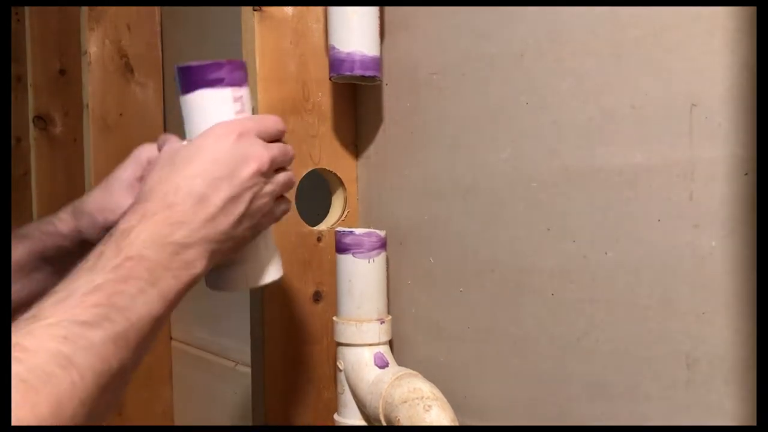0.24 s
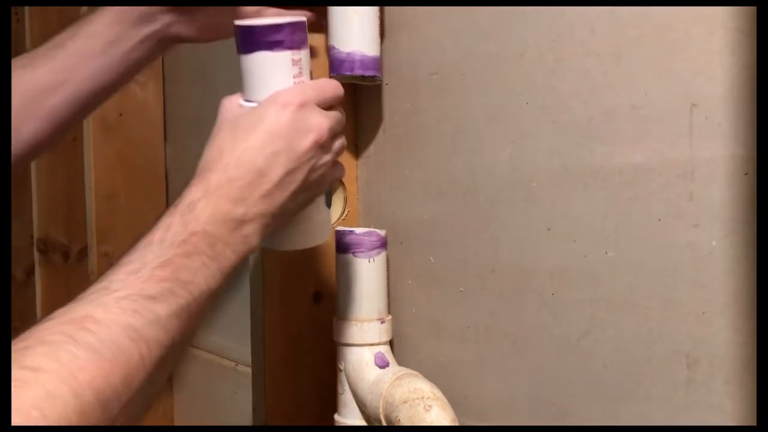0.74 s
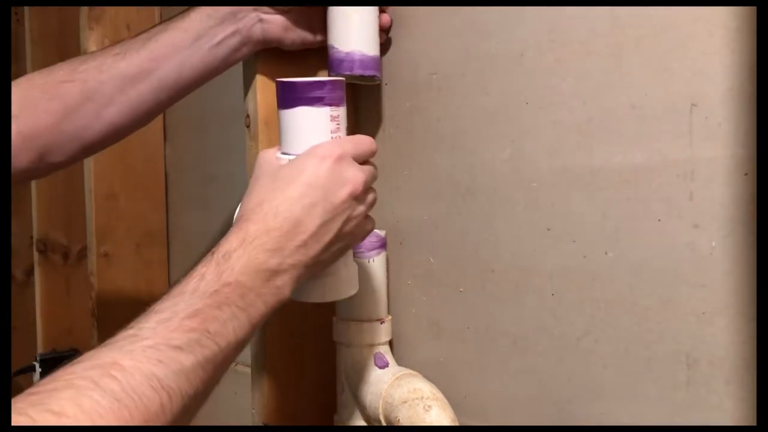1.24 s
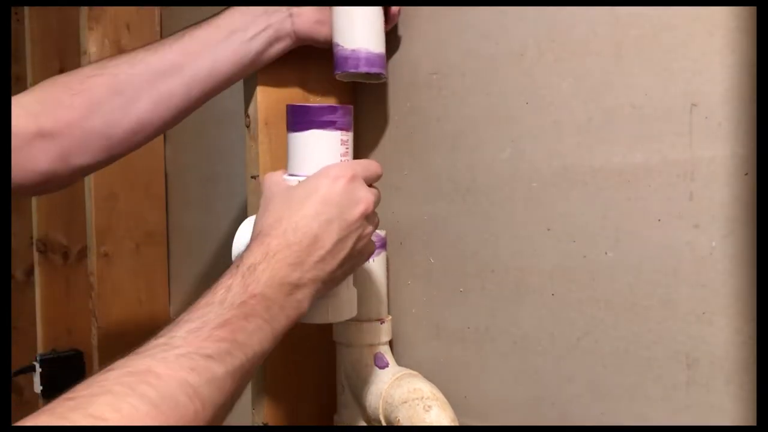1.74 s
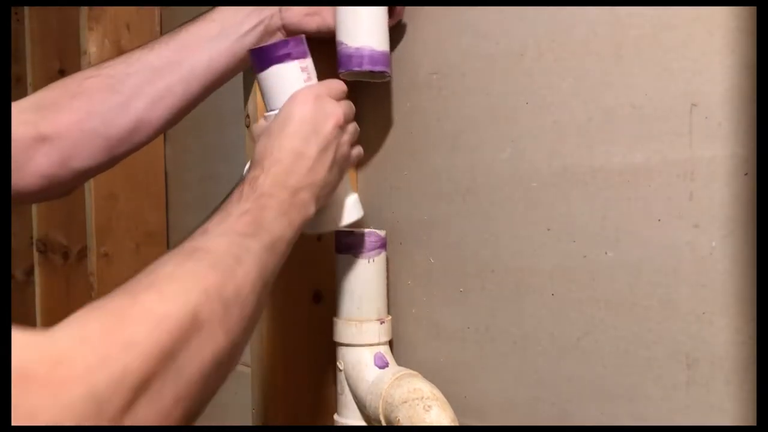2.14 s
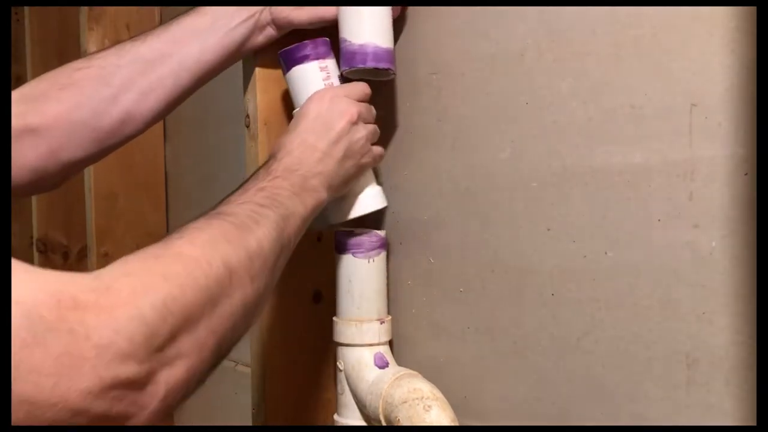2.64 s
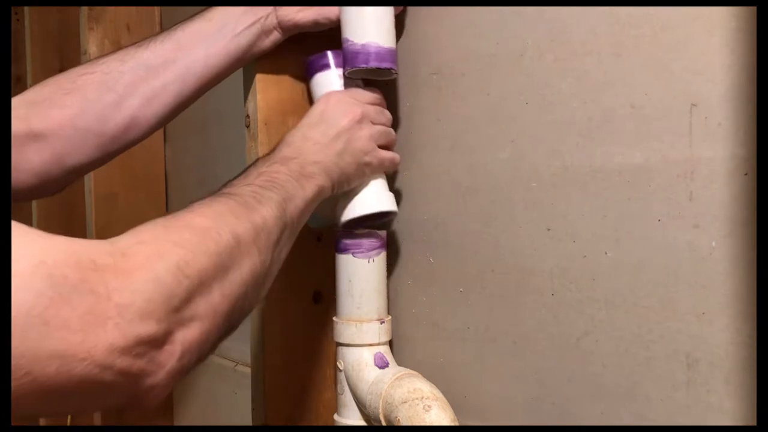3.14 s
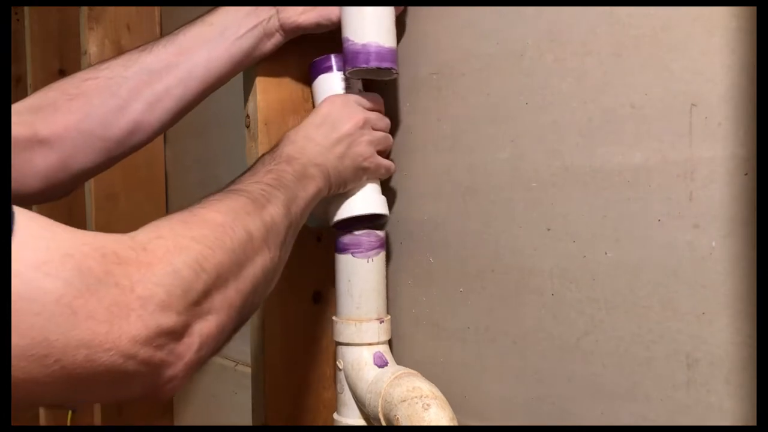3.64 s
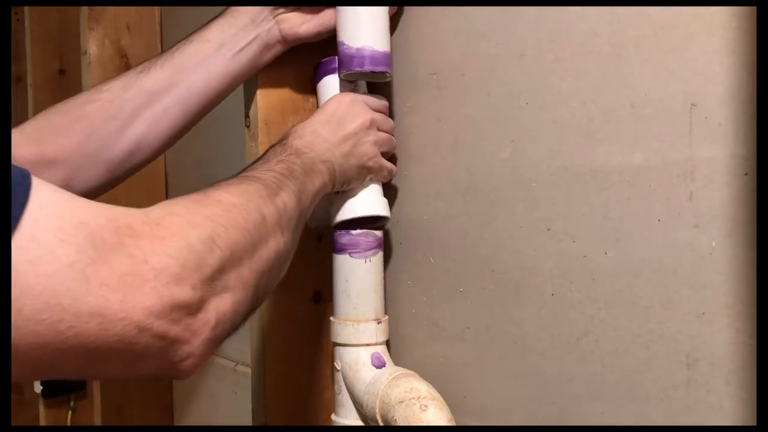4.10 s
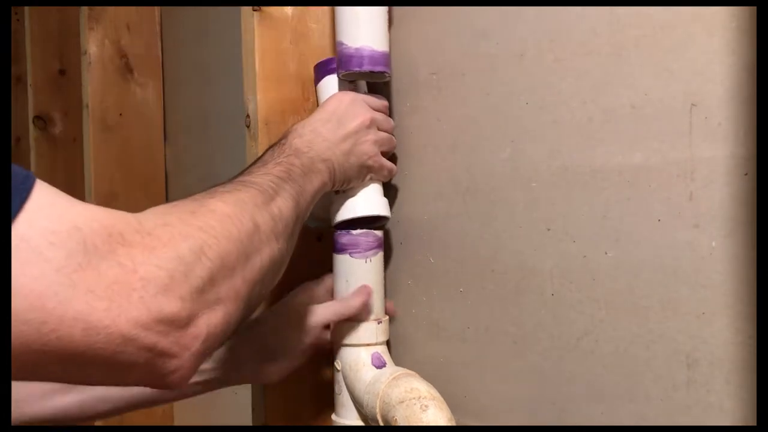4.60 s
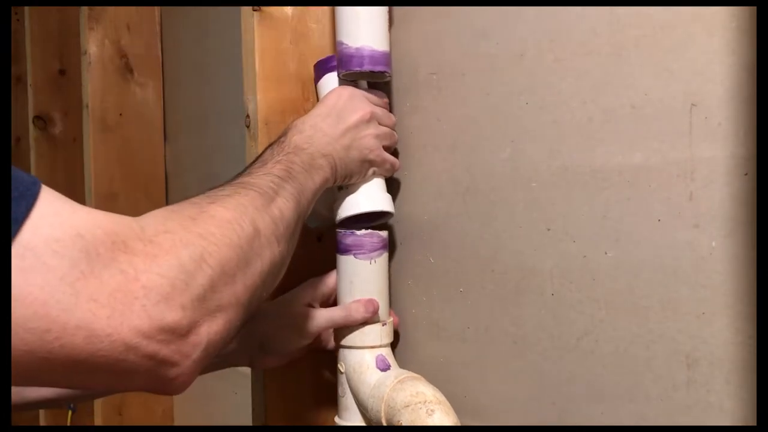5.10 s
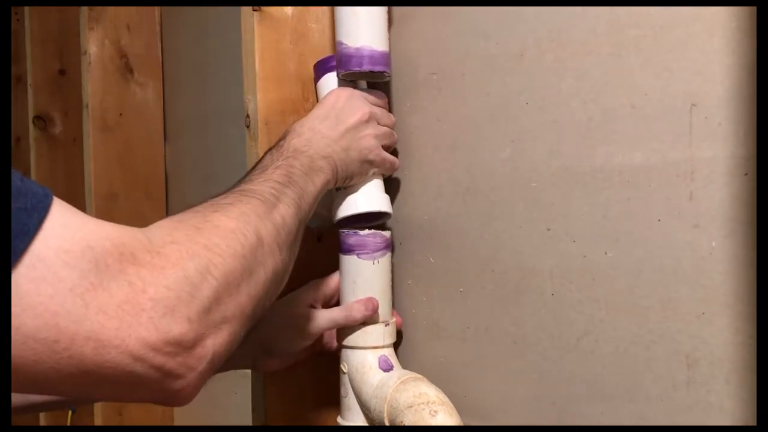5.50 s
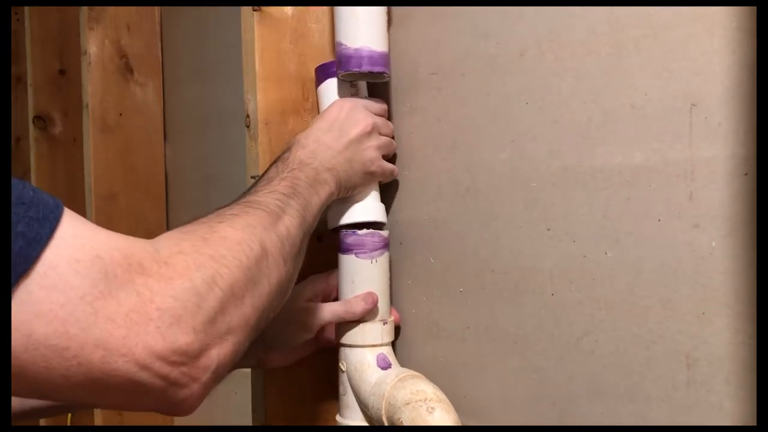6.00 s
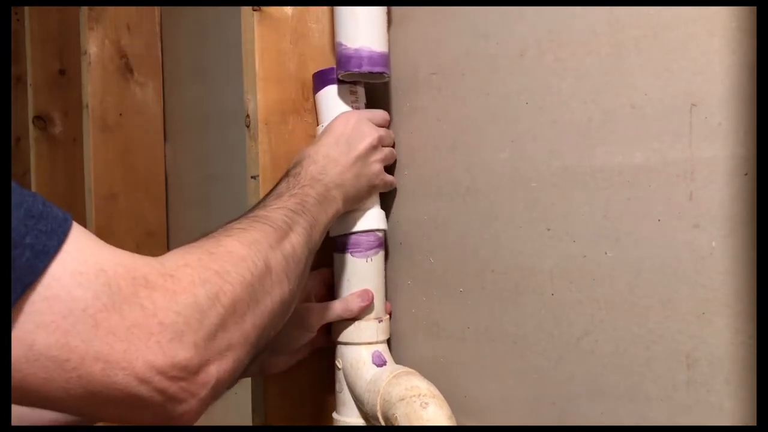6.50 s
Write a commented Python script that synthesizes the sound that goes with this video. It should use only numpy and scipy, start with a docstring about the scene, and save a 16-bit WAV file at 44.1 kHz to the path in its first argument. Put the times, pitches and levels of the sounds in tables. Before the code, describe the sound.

A phone close to a stud wall picks up dry plastic scraping, brief squeaks and hollow pipe knocks, with short room echoes. Three sharp knocks stand out in the first half, another moderate one follows, then handling grows sparser until a dull low thump and gritty, ticking rubs at the end. Steady low air noise and a faint high whine lie beneath.

```python
"""In a bare room, close to a phone, a plastic drain fitting is worked into a gap between two pipes on a stud wall.
Ventilation lies underneath: coloured noise for the low rumble, two wandering tones for the whine.
Skin hiss is shaped noise, plastic scrape a dense train of slips; narrow squeaks and broader squeaky rubs are
wandering carriers, and edges tick in noise bursts. Decaying modes make the wall thud and the fitting knock
hollowly against pipe and stud. The room answers the handling with a short tail whose lows last longest."""
import sys
import numpy as np
from scipy import signal
from scipy.fft import rfft, irfft
from scipy.io import wavfile

SR = 44100
rng = np.random.default_rng(int(sys.argv[2]) if len(sys.argv) > 2 else 0)


def file_out(sig):
    """Save sig as 16-bit WAV at sys.argv[1]."""
    # one column per channel
    cols = np.atleast_2d(sig).T
    # limit, then scale
    lim = np.clip(cols, -1, 1)
    pcm = np.round(lim * 32767).astype(np.int16)
    wavfile.write(sys.argv[1], SR, pcm)


N = 297675
T = np.arange(N) / SR
RING = T[:SR // 2]  # half a second for every ring and tail


def undb(db):
    """Decibels to gain."""
    return 10 ** (np.asarray(db) / 20)


def unit(x):
    """Scale to rms 1."""
    return x / np.sqrt(np.mean(x ** 2))


def decay(t60):
    """Exponential die-away that falls 60 dB in t60 seconds."""
    return np.exp(-np.log(1000) * RING / t60)


def add(track, start_s, sound):
    """Mix a sound into the track at its start time."""
    i = max(int(start_s * SR), 0)
    track[i:i + len(sound)] += sound[:N - i]


def octaves(length):
    """Position of each spectrum bin in octaves above 1 Hz."""
    return np.log2(np.maximum(np.fft.rfftfreq(length, 1 / SR), 1))


def colour(x, points, tilt_db=0):
    """Equalise by (f/Hz, level/dB) points and a tilt in dB per octave; rms 1."""
    octave = octaves(len(x))
    hz, db = np.transpose(points)
    edges = np.log2(hz)
    curve = np.interp(octave, edges, db) + tilt_db * octave
    low_skirt = 12 * np.minimum(octave - edges[0], 0)  # 12 dB per octave below the first point
    return unit(irfft(rfft(x) * undb(curve + low_skirt), len(x)))


def walk(rate):
    """Random wander of rms 1, gliding between `rate` fresh values a second."""
    return unit(np.interp(T * rate, np.arange(SR), rng.standard_normal(SR)))


def whistle(hz, width_hz):
    """An unsteady tone or, at larger widths, a band of noise: two quadrature carriers of wandering strength."""
    in_phase = walk(width_hz) * np.sin(2 * np.pi * hz * T)
    quadrature = walk(width_hz) * np.cos(2 * np.pi * hz * T)
    return in_phase + quadrature


def ring(modes, contact_ms, rise_s):
    """Modes after one push: a longer contact weakens the high ones, and the ring takes a moment to build."""
    hz, t60, db = np.transpose(modes)[:, :, None]
    push = 1 / np.sqrt(1 + (hz * contact_ms / 1000) ** 4)
    waves = undb(db) * push * decay(t60) * np.sin(2 * np.pi * hz * RING)
    return waves.sum(axis=0) * (1 - np.exp(-(RING / rise_s) ** 2))


# spectrum of the ventilation rumble: f/Hz, level/dB
RUMBLE_COLOUR = [(15, -37), (25, -4), (66, 3), (242, -4), (677, -11), (1160, -14), (1260, -13.5),
                 (1610, -21), (2840, -28), (3340, -25.5), (3720, -35), (5880, -31.5), (9070, -52),
                 (14000, -36.5), (16000, -44)]
# thin whine of the moving air: f/Hz, width/Hz, level/dB
WHINE = [(3260, 62, -82.5), (3435, 200, -80.5)]


def ventilation():
    """A nearly steady low rumble with a faint high whine of moving air."""
    rumble = colour(rng.standard_normal(N), RUMBLE_COLOUR) * undb(-53.5 + .5 * walk(2.91))
    whine = sum(undb(db) * whistle(hz, width_hz) for hz, width_hz, db in WHINE)
    return rumble + whine


# narrow squeaks and broader squeaky rubs of dry plastic: middle t/s, length/s, f/Hz, width/Hz,
# level before flutter/dB
SQUEAKS = [(.32, .09, 3260, 2840, -57), (1.314, 0.16, 2900, 890, -65.5), (0.384, 0.028, 2600, 1775, -56.5),
           (0.622, 0.048, 747, 605, -46), (3.013, 0.2, 6300, 514, -67.5), (3.07, 0.2, 1000, 692, -55),
           (3.277, .066, 11950, 1000, -68), (3.485, 0.067, 12000, 1010, -61), (6.205, .12, 3950, 885, -62),
           (6.242, 0.18, 1910, 1310, -58.5), (6.33, .025, 4060, 494, -56), (6.33, .04, 2085, 496, -57)]


def squeaks():
    """Dry plastic squeaks and rubs faintly as it drags, in quick stuttering catches."""
    out = np.zeros(N)
    for middle, length, hz, width_hz, db in SQUEAKS:
        swell = np.exp(-(2 * (T - middle) / length) ** 2)
        out += undb(db) * whistle(hz, width_hz) * swell
    flutter = undb(2.5 * walk(120) - 2)
    return out * flutter


def stroke(start, length):
    """Speed of one stroke as a gain: it speeds up, slows as it goes, then lifts off."""
    attack_share, sag_db_per_length, release_s = 0.29, 5.5, 0.014
    progress = np.clip((T - start) / length, 0, 1)
    rise = np.sin(np.pi / 2 * np.minimum(progress / attack_share, 1)) ** 2
    sag = undb(-sag_db_per_length * np.maximum(progress - attack_share, 0))
    release = np.exp(-np.maximum(T - start - length, 0) / release_s)
    return rise * sag * release


def slips(rate, spread_db):
    """Friction as a random train of tiny slips of uneven size, `rate` a second on average."""
    happens = rng.random(N) < rate / SR
    extra_db = spread_db * np.minimum(rng.exponential(size=N), 4)
    return happens * rng.standard_normal(N) * undb(extra_db)


# strokes of hand and fitting along the pipe: start t/s, length/s, light skin hiss drive level/dB,
# firm scrape drive level/dB
STROKES = [(0.28, 0.15, -64.5, -58), (.56, 0.12, -85, -61), (0.803, 0.064, -68, -57),
           (1.245, 0.079, -68, -60.5), (1.355, 0.15, -64, -62.5), (1.453, 0.35, -66, -62.5),
           (2.028, 0.2, -60, -71), (2.548, 0.087, -69, -56.5), (2.835, 0.18, -67, -63.5),
           (3.375, 0.13, -62.5, -53.5), (3.995, .14, -55.5, -58.5), (4.05, .16, -56.5, -80),
           (4.429, 0.16, -56, -79), (4.533, .035, -53, -53.5), (4.558, 0.3, -71.5, -63),
           (5.089, .06, -67, -55), (5.291, 0.026, -71, -62), (5.439, 0.038, -74, -59.5),
           (5.73, 0.087, -67, -60.5), (6.141, 0.26, -61.5, -58.5), (6.455, 0.095, -65, -63),
           (6.564, 0.18, -64, -65.5)]
# faint hiss between strokes: t/s, drive level/dB
HISS_FLOOR = [(0, -68), (1.7, -73.5), (2.4, -73), (3.3, -76), (3.95, -71), (4.3, -77.5), (5.2, -82),
              (5.45, -75.5), (6.1, -72.5), (6.75, -70)]
# spectrum of skin on smooth pipe: f/Hz, level/dB
HISS_COLOUR = [(1500, -3), (4000, -4), (7000, 0.5), (11000, -1.5), (16000, -4)]
# spectrum of plastic scraping under pressure: f/Hz, level/dB
SCRAPE_COLOUR = [(120, 4), (300, 14), (800, 9), (1300, 5.5), (1700, 1.5), (2100, 1), (2800, -4.5),
                 (4000, -5), (4800, -8.5), (7000, -14), (14000, -44)]


def sliding():
    """Skin hisses lightly over the smooth pipe; under pressure the plastic scrapes and stirs the hollow body."""
    hiss_power = undb(np.interp(T, *np.transpose(HISS_FLOOR))) ** 2
    # the held fitting never rests quite still
    scrape_power = undb(-68.5 + 2.0 * walk(11)) ** 2
    for start, length, hiss_db, scrape_db in STROKES:
        speed = stroke(start, length)
        hiss_power += (undb(hiss_db) * speed) ** 2
        scrape_power += (undb(scrape_db) * speed) ** 2

    hiss = colour(rng.standard_normal(N), HISS_COLOUR) * undb(0.89 * walk(40))
    grip = slips(rate=5000, spread_db=1.5) * undb(3.2 * walk(35))
    scrape = colour(grip, SCRAPE_COLOUR) * undb(4.5)
    body_ring = ring(PIPE_MODES, contact_ms=2.8, rise_s=0.0033)
    body = unit(signal.fftconvolve(grip, body_ring)[:N]) * undb(-1.0)
    # burrs on the sawn edge catch one by one
    grit = colour(slips(rate=220, spread_db=2), TICK_COLOUR, tilt_db=-2.5) * undb(-7.5)
    return hiss * np.sqrt(hiss_power) + (scrape + body + grit) * np.sqrt(scrape_power)


# plastic edges catching and slipping: t/s, level before decay/dB, tilt/dB per octave, t60/s
TICKS = [(0.299, -50, -18, .15), (.564, -50, -7, .05), (0.722, -54, -1, 0.047), (.807, -47.5, -1.5, .086),
         (2.161, -26, -12.5, 0.049), (2.286, -53, 0, 0.033), (2.479, -39, -12.5, .03),
         (2.5375, -40.5, -3.5, 0.033), (2.717, -54, -3, 0.026), (2.793, -55, 0, 0.17),
         (3.399, -40.5, -2, 0.038), (3.477, -41, -5.5, 0.052), (3.679, -47.5, -1, 0.017),
         (4.425, -50.5, 2, 0.064), (5.2893, -55.5, -3, .024), (5.4376, -50.5, -4, .012),
         (5.5083, -47, 3.5, .018), (5.742, -48, -3, 0.069), (5.807, -51, -2, 0.061), (6.204, -49.5, 2, .22),
         (6.321, -43.5, 9, 0.067), (6.434, -52, -3, .03), (6.465, -47, 2.5, 0.11), (6.517, -51, 2, 0.086),
         (6.706, -54.5, 1.5, 0.096)]
# spectrum of an edge letting go, also used for the grit in the sliding: f/Hz, level/dB
TICK_COLOUR = [(500, -6.5), (1200, 0), (1600, 6), (2150, 4.5), (2900, -0.5), (4100, 4), (4900, 0),
               (6200, 0), (9000, -6.5), (16000, -6.5)]


def ticks():
    """An edge lets go in a short, dying crackle of coloured noise."""
    out = np.zeros(N)
    for start, db, tilt_db, t60 in TICKS:
        crack = colour(rng.standard_normal(len(RING)), TICK_COLOUR, tilt_db)
        add(out, start, undb(db) * crack * decay(t60))
    return out


# shoves carried into the wall: t/s, drive level/dB, contact time/ms
THUDS = [(.002, -46, 7.5), (.41, -47, 8.5), (0.58, -47.5, 3), (.628, -45, 2), (0.84, -55, 2),
         (3.484, -45.5, 10), (4.165, -43, 18), (4.438, -42, 2.2), (4.499, -46, 2.6), (4.619, -45.5, 12.4),
         (5.128, -53, 2), (5.836, -30, 29.3), (5.985, -45, 9.8), (6.386, -46.5, 13)]
# modes of the stud wall that carries the pipes: f/Hz, t60/s, level/dB
WALL_MODES = [(59.4, 0.17, 9.5), (66.3, 0.089, 9.5), (89.1, 0.22, 11.5), (113, 0.14, 4),
              (155.7, 0.19, 12.5), (214.8, 0.23, 10.5)]


def thuds():
    """The wall takes up the heavier shoves, and a little of every knock, as a slow low ring."""
    rise_s = .0113
    out = np.zeros(N)
    for start, db, contact_ms in THUDS:
        add(out, start, undb(db) * ring(WALL_MODES, contact_ms, rise_s))
    shaken = ring(WALL_MODES, contact_ms=5, rise_s=rise_s)
    for start, db, *_ in KNOCKS:
        add(out, start, undb(db - 39) * shaken)
    return out


# knocks of the fitting: t/s, drive level/dB, hollow air note f/Hz, contact time/ms, relative rim level/dB
KNOCKS = [(.002, -31.5, 485, 0.22, 2.5), (.564, -38, 400, 0.7, -1), (.572, -23, 218, 8.4, 6),
          (0.594, -30.5, 228, 1.2, -12), (.613, -33, 263, 2.4, 9), (.645, -24.5, 222, 3.5, 1),
          (.808, -38, 403, .75, 8), (.876, -45, 408, 1.0, 3), (2.1616, -7, 439.6, 0.66, 5),
          (2.456, -42, 430, 0.83, 6.5), (2.484, -32, 285, 0.73, -13), (2.506, -33, 393, 3.6, -21),
          (2.538, -8.5, 427, 0.89, -4), (2.5468, -15, 433, 11, -19), (2.871, -36.5, 290, 1.6, 2),
          (3.126, -27, 261, 2.3, 3), (3.227, -30.5, 206, 2.6, -2), (3.264, -33.5, 234, 4.7, -2),
          (3.436, -34, 395, 1.2, -2), (3.4791, -12.5, 325.6, 1.35, -4), (3.483, -21, 440, 17, -16),
          (3.642, -39, 252, 3.6, 14), (3.734, -42.5, 306, .82, 10), (4.426, -18, 442, 1.03, -6.5),
          (4.465, -29.5, 417, 1.7, -4), (4.869, -36, 220, 2.7, 0), (5.807, -34.5, 230, .55, 9),
          (5.969, -32, 189, 0.46, -3), (5.996, -34, 228, 2.8, -4), (6.379, -46, 415, .7, 10.5),
          (6.432, -42, 413, .6, 2)]
# wall modes of the fitting and its pipe: f/Hz, t60/s, level/dB
PIPE_MODES = [(211.7, 0.21, -21), (261.6, 0.087, -10), (291, 0.077, -7.5), (374, 0.048, -32),
              (466, 0.087, -10), (523.2, 0.063, -6), (630, 0.089, -14), (914, 0.023, -5.5),
              (1030, 0.022, -6.5), (1170, 0.04, -16.5), (1278, 0.031, -10), (1518, 0.02, -8),
              (1677, 0.011, 0), (2140, 0.016, -10), (2595, 0.02, -17.5), (2840, 0.022, -15)]
# the open rim flexing oval when caught on the edge: f/Hz, t60/s, level/dB
RIM_MODES = [(743, 0.027, -11), (776.6, 0.027, 0), (824, 0.044, -6)]


def knocks():
    """Each knock rings the enclosed air, the plastic wall and, by where it lands, the rim."""
    out = np.zeros(N)
    for start, db, hollow_hz, contact_ms, rim_db in KNOCKS:
        # the air note is lower where hand and pipe end cover more of the opening
        hollow = ring([(hollow_hz, .045, 3)], contact_ms=.5, rise_s=0.0038)
        shell = ring(PIPE_MODES, contact_ms, rise_s=0.004)
        rim = ring(RIM_MODES, contact_ms, rise_s=0.004)
        add(out, start, undb(db) * (hollow + shell + undb(rim_db) * rim))
    return out


# decay of the bare room: f/Hz, t60/s
ROOM_T60 = [(100, 0.57), (260, 0.3), (700, 0.29), (1800, 0.25), (5000, 0.14), (14000, 0.097)]


def room(x, wet_db, build_s):
    """Close bare walls give a quickly thickening echo whose lows stay longest."""
    noise = rfft(rng.standard_normal(len(RING)))
    noise = noise / np.abs(noise) * np.sqrt(len(RING))  # flat spectrum, random phase
    octave = octaves(len(RING))
    hz, t60 = np.transpose(ROOM_T60)
    tail = np.zeros(len(RING))
    # overlapping bands, each with its own decay
    for share, band_t60 in zip(np.eye(len(hz)), t60):
        band = noise * np.interp(octave, np.log2(hz), share)
        tail += irfft(band, len(RING)) * decay(band_t60)
    tail *= 1 - np.exp(-(RING / build_s) ** 2)
    echo = signal.fftconvolve(x, tail / np.linalg.norm(tail))[:N]
    return x + undb(wet_db) * echo


def scene():
    """Blows and friction excite the room; the ventilation is mixed in without added echo."""
    friction = room(ticks() + sliding() + squeaks(), wet_db=-8.5, build_s=0.0059)
    blows = room(knocks() + thuds(), wet_db=-8.5, build_s=0.0067)
    return (ventilation() + friction + blows)[None]


def record(dry):
    """The phone thins the deepest bass and cuts the top."""
    bass_cut = signal.butter(5, 43, "high", fs=SR, output="sos")
    top_cut = signal.ellip(10, .2, 70, 15900, fs=SR, output="sos")
    return signal.sosfilt(top_cut, signal.sosfilt(bass_cut, dry))


dry = scene()
out = record(dry)
file_out(out)
```